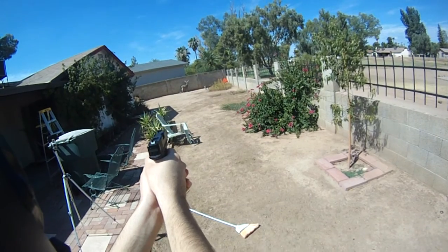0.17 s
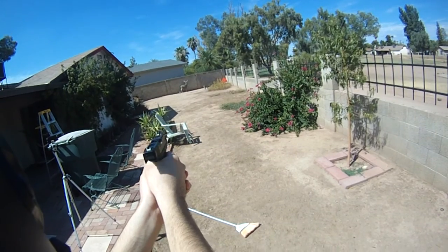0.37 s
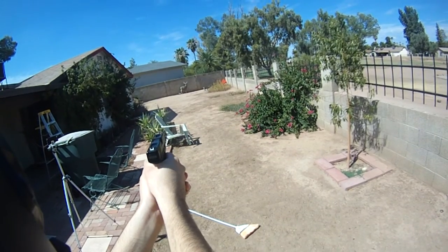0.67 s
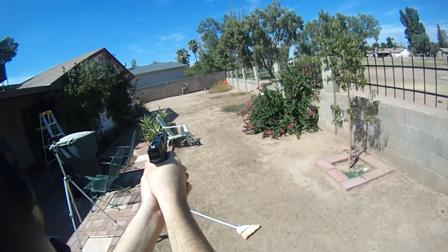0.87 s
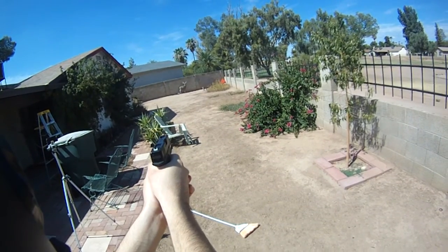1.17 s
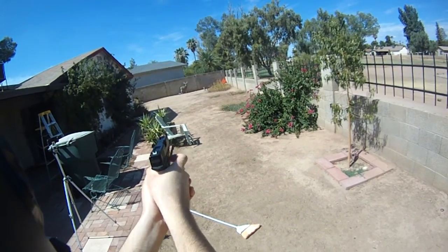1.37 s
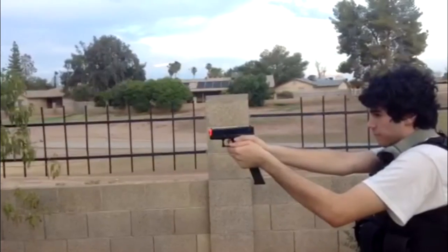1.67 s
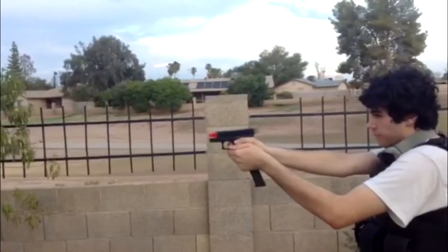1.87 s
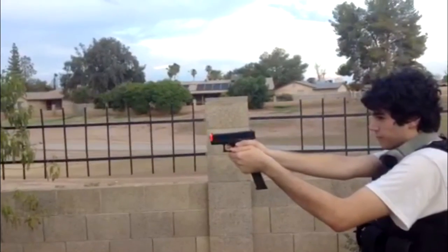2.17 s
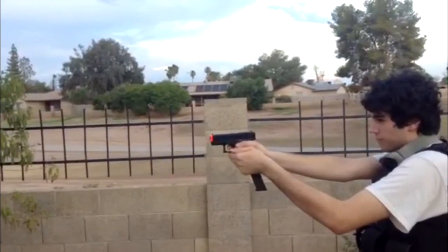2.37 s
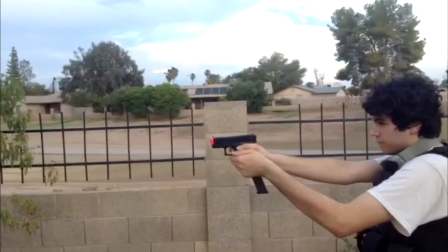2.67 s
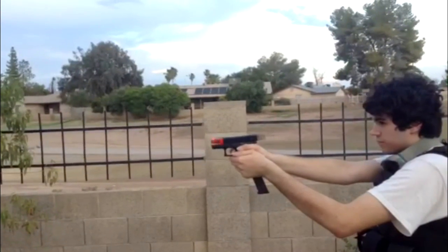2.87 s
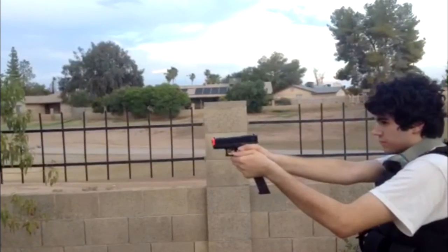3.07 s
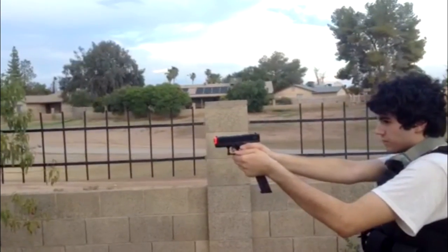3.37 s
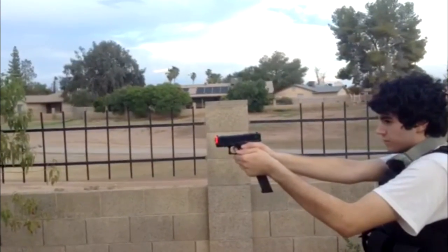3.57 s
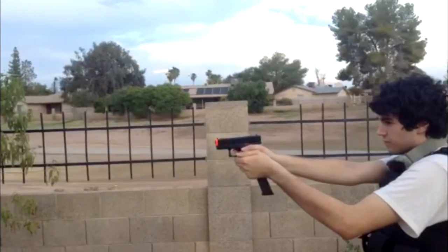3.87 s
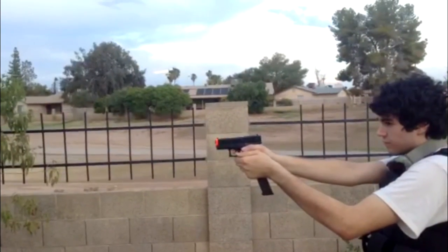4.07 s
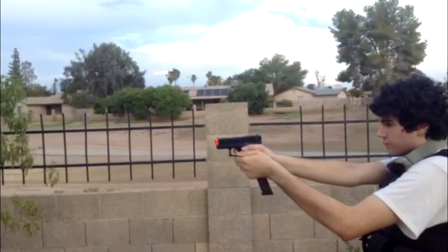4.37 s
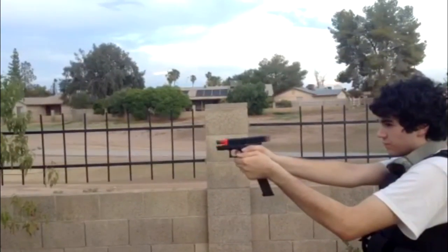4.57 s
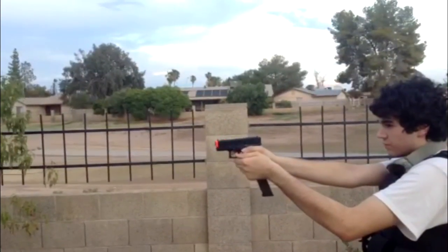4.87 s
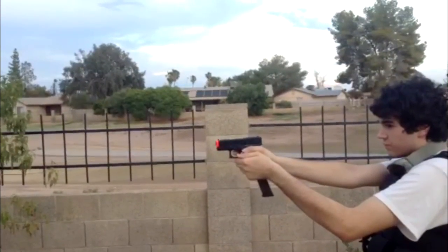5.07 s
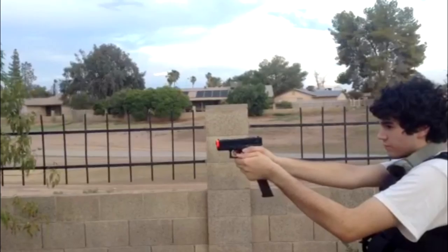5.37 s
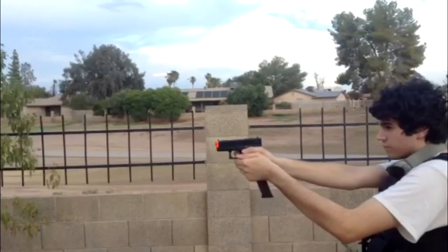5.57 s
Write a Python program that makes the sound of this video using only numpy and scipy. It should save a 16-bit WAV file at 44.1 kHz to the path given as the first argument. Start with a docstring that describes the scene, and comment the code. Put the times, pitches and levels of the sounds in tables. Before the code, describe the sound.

Near silence, then a gas airsoft pistol fires a rapid burst of eight muffled pops with whistling slide clacks, heard through a closed microphone housing, ending in a short gas leak. After small ticks, the sound cuts to an open microphone at the side: louder, sharp bursts of three to six pops about a second apart, with slide clatter, block-wall echo, faint traffic and hiss.

```python
"""After a faint tick in near silence, a gas airsoft pistol fires a fast, muffled burst in a walled yard.
The first part is heard from behind through a closed microphone housing, the rest from the side by an open microphone
whose sound drops out after the strongest pops. Slide contacts are noise bursts ringing in body modes;
gas pops and vents are cracks plus a low pressure push, and from the side a hiss. Walls are decaying noise tails.
Coloured noise makes the faint air behind, and the rumble, far traffic and hiss at the side."""
import sys
import numpy as np
from scipy import signal
from scipy.fft import rfft, irfft, next_fast_len
from scipy.io import wavfile
from scipy.ndimage import uniform_filter1d, map_coordinates

SR = 44100
rng = np.random.default_rng(int(sys.argv[2]) if len(sys.argv) > 2 else 0)


def field_ratio(decibels):
    """Amplitude ratio for a level in dB (20 dB per decade); scalars and array-likes work."""
    return 10 ** (np.asarray(decibels, dtype=float) / 20)


def dump(signal):
    """Clip the signal to [-1, 1] and save it as 16-bit WAV at the path in sys.argv[1]."""
    limited = np.clip(np.atleast_2d(signal).T, -1, 1)
    pcm = np.round(limited * 32767).astype(np.int16)
    wavfile.write(sys.argv[1], SR, pcm)


N = 252681
SWITCH_S = 1.412  # the listening point moves from behind to the side
POP_LEAD_S, VENT_LEAD_S = 0.0015, 0.001067  # the crack precedes the low push

# gas pops at the muzzle: (time [s], crack level [dB], low push level [dB])
POPS = [(0.368, -11, -22), (0.4175, -14, -15), (0.4713, -11.5, -22.5), (0.5286, -11.5, -18),
        (.588, -15.5, -27), (0.6475, -10.5, -21), (.704, -12.5, -16), (0.7577, -17, -19.5),
        (1.7055, -7, 3.5), (1.7562, -7, 0.5), (1.8067, -9, -0.5), (1.8503, -9.5, -4), (1.8922, -5.5, 3),
        (2.7571, -7, 3), (2.7984, -10, 1), (2.843, -8.5, -29.5), (2.8845, -8, -11), (2.9265, -5, -3),
        (3.6576, -5, 3.5), (3.6999, -5.5, -4), (3.741, -5, -10.5), (3.7833, -5.5, -23), (3.8259, -4, -6.5),
        (4.527, -6.5, -44), (4.5697, -5, 3.5), (4.6136, -7, -2.5), (4.6579, -4, -16.5),
        (4.7053, -11.5, -10.5), (4.7543, -10, -39.5), (5.6132, -6.5, -31.5), (5.6671, -18, -7.5),
        (5.729, -13.5, -14)]
# gas vents as the slide opens: (time [s], crack level [dB], low push level [dB])
VENTS = [(0.375, -16.5, -11), (0.4259, -17.5, -15), (0.4803, -16, -30.5), (0.5396, -18.5, -21.5),
         (0.599, -20.5, -20.5), (0.6606, -20, -19), (.729, -30, -26), (1.8573, -12.5, -28),
         (1.8989, -18, -32.5), (2.7647, -26, -31), (2.805, -12.5, -13), (2.8503, -13.5, -6.5),
         (2.8919, -17.5, -4.5), (2.9345, -14, -6.5), (3.663, -22, -33.5), (3.7073, -12, -24),
         (3.7476, -9, -9), (3.7913, -9, -5), (3.8353, -20.5, -10), (4.535, -12.5, -4), (4.5786, -13.5, -15),
         (4.6225, -17, -10), (4.668, -27.5, -9.5), (4.7158, -21, -9), (4.7661, -22, -10.5),
         (5.6254, -19, -16.5), (5.6807, -12, -17.5)]
# slide hits its rear stop: (time [s], level [dB])
STOPS = [(0.3855, -14), (0.4367, -20), (.4923, -20.5), (.5513, -21), (0.6113, -19), (0.6724, -18),
         (1.8239, -21.5), (1.8657, -12.5), (1.905, -26), (2.7707, -14.5), (2.815, -10), (2.8566, -6.5),
         (2.8995, -8), (2.94, -11.5), (3.6715, -12), (3.714, -8.5), (3.757, -9), (3.7995, -11.5),
         (3.8437, -8.5), (4.5405, -6), (4.586, -21), (4.6319, -11), (4.6768, -11.5), (4.729, -11.5),
         (4.7794, -14.5), (5.6356, -13), (5.6931, -15.5)]
# slide slams home: (time [s], level [dB], extra ringing [dB])
SLAMS = [(0.4084, -12, -1.5), (0.4621, -12.5, -3), (0.5204, -10.5, 5), (0.5779, -13.5, 0),
         (0.6385, -15, -0.5), (0.6963, -13, -10), (0.7498, -12, -9), (1.7495, -14, -7), (1.801, -7, -5),
         (1.844, -8.5, -3), (1.8847, -8.5, -0.5), (1.9278, -8, 0), (2.7916, -8.5, -2), (2.8356, -8.5, -2),
         (2.8775, -6, 1), (2.9198, -7.5, 6), (2.9617, -9.5, 0.5), (3.6928, -10, 0), (3.7323, -8, -4),
         (3.7752, -12, 12), (3.8189, -11.5, 4), (3.8633, -7.5, 9.5), (4.5624, -6, 5), (4.6061, -7.5, -1.5),
         (4.6495, -8.5, -1), (4.6985, -3.5, -2.5), (4.7469, -6.5, -1), (4.8025, -6.5, 5.5),
         (5.6609, -4, -3), (5.7198, -3, -3)]
# lighter knocks of the slide on its way: (time [s], level [dB])
RATTLES = [(0.398, -29), (0.406, -32), (0.4484, -29.5), (0.4555, -30), (.5042, -32.5), (.535, -24),
           (.563, -41), (0.5687, -33), (0.6225, -33), (.6306, -30), (.6557, -30.5), (0.684, -31),
           (2.83, -17), (3.7695, -17), (3.8566, -22), (3.8792, -19), (4.617, -16.5), (4.627, -15.5),
           (4.6643, -11), (4.6713, -14), (4.7211, -12.5), (4.7714, -11.5), (4.8195, -18.5), (5.6182, -12.5),
           (5.6711, -10)]
# trigger, hand and other small ticks: (time [s], level [dB], added tilt [dB/octave])
TICKS = [(.047, -59, -19), (0.3643, -24, -6), (.9772, -48.5, -0.5), (1.0006, -52, .5), (1.1024, -56.5, -3),
         (1.1628, -43, -3), (1.188, -48.5, -1), (1.2216, -57, -5), (2.2336, -39.5, -5), (2.2994, -45, -2),
         (2.3294, -41.5, 0), (3.2075, -40.5, -3), (3.2448, -15, 2), (3.2502, -19, 0.5), (3.3606, -36, -4.5),
         (3.386, -40, -5), (3.6165, -41, -4), (4.138, -39, -2.5), (4.1565, -31.5, 0), (4.1814, -37, -2),
         (4.253, -38.5, -3), (4.261, -34.5, -4), (4.305, -52, 9), (4.4727, -45, -6), (5.035, -40, -11),
         (5.1578, -40, 0), (5.1781, -31, 2), (5.2027, -37, 1), (5.218, -42.5, -5), (5.5932, -32, 3)]


def strokes(colour, start_s, end_s):
    """Contacts and cracks as (s, dB, t60 s, tilt, ringing dB): those of the gun's cycle, then the ticks."""
    kinds = [
        [(s - POP_LEAD_S, db, 0, 0) for s, db, _ in POPS],
        [(s - VENT_LEAD_S, db, 0, 0) for s, db, _ in VENTS],
        [(s, db, 0, 0) for s, db in STOPS],
        [(s, db, 0, ring_db) for s, db, ring_db in SLAMS],
        [(s, db, 0, 0) for s, db in RATTLES],
        [(s, db, tilt, 0) for s, db, tilt in TICKS],
    ]
    coloured = []
    for rows, (t60, tilt, ring_db) in zip(kinds, colour):
        coloured.append([(s, db, t60, tilt + own_tilt, ring_db + more_db)
                         for s, db, own_tilt, more_db in rows if start_s <= s < end_s])
    *cycle, ticks = coloured
    return sum(cycle, []), ticks


def clacks(rows, modes, broad_db, low_hz, high_hz, rise_s, strike, spiky_db, scatter_db):
    """A first-sample strike and spiky decaying noise; returns the straight part and the part ringing in the modes."""
    s, db, t60, tilt, ring_db = np.transpose(rows)[:, :, None]
    t = np.arange(3072) / SR
    noise = rng.standard_normal((len(rows), 2, len(t)))
    spikes_and_decay_db = spiky_db * noise[:, 1] - 60 * t / np.clip(t60, 0.002, 0.2)
    burst = noise[:, 0] * field_ratio(spikes_and_decay_db) * (1 - np.exp(-t / rise_s))
    burst[:, 0] = strike
    scatter = scatter_db * rng.standard_normal((len(rows), len(modes)))

    def paths(hz):
        slope = (1 + 1j * hz / 1500) ** (np.clip(tilt, -9, 9) / 6.02)  # tilt acts above about 1.5 kHz
        straight = field_ratio(broad_db) * high_pass(hz, low_hz, 0.91) / (1 + 1j * hz / high_hz)
        ringing = field_ratio(ring_db) * rings(hz, modes, scatter)
        return [straight * slope, ringing * slope]

    sound = filtered(burst, paths, size=1024)
    loudest = np.sqrt(uniform_filter1d(sound.sum(0) ** 2, size=88).max(1, keepdims=True))  # 2 ms rms
    sound *= field_ratio(db) / loudest
    where = np.round(s * SR).astype(int) + np.arange(len(t))
    return [np.bincount(where.ravel(), part.ravel(), N + len(t))[:N] for part in sound]


def rings(hz, modes, scatter_db):
    """Sum of well-damped resonances of alternating sign, at new strengths for every row of scatter."""
    total = 0
    for k, (centre_hz, width_hz, db) in enumerate(modes):
        q_term = 1j * (hz / centre_hz - centre_hz / hz) * centre_hz / max(width_hz, 200)
        total = total + (-1) ** k * field_ratio(db + scatter_db[:, k:k + 1]) / (1 + q_term)
    return total


def releases(start_s, end_s):
    """Low pushes of gas between two times, as (s, dB)."""
    return [(s, db) for s, _, db in POPS + VENTS if start_s <= s < end_s]


def pops(rows, length_s, front_s, spike):
    """Each release of gas: a thin pressure spike, then a longer swing the other way."""
    t = np.arange(800) / SR
    pulse = spike * np.exp(-(t / front_s) ** 2) - t / length_s * np.exp(1 - t / length_s)
    return np.convolve(kicks(rows), pulse)[:N]


def jet(rows, t60_s, soften):
    """Gas hisses on round the slide; an exponent below 1 narrows the gap between weak and strong releases."""
    flow = signal.lfilter([1], [1, -field_ratio(-60 / t60_s / SR)], kicks(rows) ** soften)
    turbulence = rng.standard_normal(N) * field_ratio(wobble(900))
    hiss = filtered(turbulence, lambda hz: high_pass(hz, 700, 0.085) / (1 + 1j * hz / 6000))
    return flow * unit(hiss)


# gas leaking as the pressure runs low: (start [s], end [s], start level [dB], extra fall after end [dB/s])
LEAK = [(0.703, .733, -30, 7999), (0.751, 0.82, -30, 378)]


def leak(modes):
    """Fluttering noise through the given modes, sagging as the pressure falls."""
    sag_db_per_s = 64
    t = np.arange(N) / SR
    flow = 0
    for start, end, db, release in LEAK:
        level_db = db - sag_db_per_s * (t - start) - release * np.maximum(t - end, 0)
        flow = flow + (t > start) * field_ratio(level_db)
    noise = filtered(rng.standard_normal(N), lambda hz: rings(hz, modes, np.zeros((1, len(modes))))[0])
    return unit(noise) * flow * field_ratio(1.4 * wobble(220))


# hammer swings in before a burst, beside: (time [s], level [dB])
HAMMERS = [(1.7005, -26), (2.7500, -22.5), (3.6491, -27), (4.5196, -22), (5.607, -23.5)]


def hammers(modes):
    """Swelling noise bursts with no sharp strike, straight and ringing parts."""
    rows = [(s, db, 0.04, 4, -5) for s, db in HAMMERS]
    return clacks(rows, modes, broad_db=-5.5, low_hz=900, high_hz=9000,
                  rise_s=0.004, strike=0, spiky_db=5, scatter_db=0.5)


# decay of the wall answer: (frequency [Hz], t60 before scaling [s])
YARD = [(200, 0.37), (1000, 0.24), (3000, 0.3), (8000, 0.29), (14000, 0.093)]


def yard(x, scale, delay_s):
    """Block walls answer: a noise tail in which each frequency dies at its own speed."""
    hz, t, z = signal.stft(rng.standard_normal(SR // 2), SR, nperseg=256)
    decay = field_ratio(-60 * t / scale / along(YARD, hz)[:, None])
    tail = signal.istft(z * decay, SR, nperseg=256)[1]
    late = np.pad(x, (round(delay_s * SR), 0))
    return signal.fftconvolve(late, tail / np.linalg.norm(tail))[:N]


# colour of pop, vent, stop, slam, rattle, tick: (t60 [s], tilt [dB/octave], ringing [dB])
COLOUR_BEHIND = [(0.016, 0, 6), (0.02, -7, -0.5), (0.0073, 1.5, 14), (0.027, 3.5, -2.5), (0.032, -2.5, 14),
                 (0.057, -1.5, 2)]
# pistol through the housing: (centre [Hz], width, at least 200 used [Hz], level [dB])
HOUSING = [(443, 190, -14), (1070, 100, -12), (1884, 510, -11.5), (2910, 406, -8.5), (4180, 190, -2.5),
           (4440, 52, -5), (5140, 314, 6), (5620, 425, 0.5), (6570, 450, -8), (7300, 280, -9.5),
           (7680, 370, -20), (9530, 270, -8), (11700, 890, -14.5), (11550, 290, -25), (13400, 380, -29),
           (14800, 720, -29.5)]


def behind():
    """The housing muffles the pops and lets the clacks whistle near 5 kHz."""
    cycle, ticks = strokes(COLOUR_BEHIND, 0, SWITCH_S)
    gun = sum(clacks(cycle + ticks, HOUSING, broad_db=-30, low_hz=206, high_hz=1516,
                     rise_s=0.00046, strike=5.2, spiky_db=6.0, scatter_db=2.0))
    push = pops(releases(0, SWITCH_S), length_s=0.00048, front_s=0.00022, spike=0.3)
    gun += filtered(push, lambda hz: 0.76 * high_pass(hz, 390, 1.1) * high_pass(hz, 143, 0.92)
                    / (1 + 1j * hz / 2000))
    walls = field_ratio(-17) * yard(gun, scale=1.0, delay_s=0.0024)
    return gun + leak(HOUSING) + walls + behind_air()


# colour of pop, vent, stop, slam, rattle, tick: (t60 [s], tilt [dB/octave], ringing [dB])
COLOUR_SIDE = [(.016, -1, -3.5), (.02, 1, 4.5), (.014, 8, 6), (.02, 5.5, 8.5), (.02, 7.5, 5),
               (.035, 2, -20)]
# ringing of the slide: (centre [Hz], width, at least 200 used [Hz], level [dB])
SLIDE = [(1137, 83, -6), (1340, 110, -10), (2327, 140, -8.5), (2312, 165, 11), (3760, 130, -3.5),
         (5404, 700, 5.5), (6600, 170, -7.5), (7120, 170, -4), (10670, 550, -17), (13600, 340, -7)]


def side():
    """Open microphone: its steep low cut rings after every pop; all but thump, clicks and circuit noise drops out."""
    gas = releases(SWITCH_S, N / SR)
    cycle, ticks = strokes(COLOUR_SIDE, SWITCH_S, N / SR)
    crack, ring = clacks(cycle, SLIDE, broad_db=-1, low_hz=405, high_hz=12300,
                         rise_s=0.000056, strike=2.0, spiky_db=7, scatter_db=2.0)
    soft = clacks(ticks, SLIDE, broad_db=10, low_hz=411, high_hz=9000,
                  rise_s=0.0002, strike=4.7, spiky_db=3.5, scatter_db=9)
    soft = filtered(np.array(soft), lambda hz: 1 / (1 + 1j * hz / 11000) ** 3)  # hands, plastic: little top
    swing = hammers(SLIDE)
    crack = crack + soft[0] + swing[0] + field_ratio(-16.0) * jet(gas, t60_s=0.065, soften=0.63)
    ring = ring + soft[1] + swing[1]
    push = pops(gas, length_s=0.00013, front_s=0.00004, spike=1.87)
    to_walls = crack + 0.33 * ring  # less of the ringing goes into the walls, so their answer sounds less tonal
    near_walls = field_ratio(-7.5) * yard(to_walls + 0.18 * push, scale=0.74, delay_s=0.005)
    far_walls = field_ratio(-23.5) * yard(to_walls, scale=1.26, delay_s=0.062)
    thump = filtered(push, lambda hz: 1.43 * high_pass(hz, 191.6, 1.59) * high_pass(hz, 63, 0.64))
    interrupted = field_ratio(gaps_db()) * (crack + ring + near_walls + far_walls + side_air())
    circuit_noise = field_ratio(-80) * rush(HISS)
    return interrupted + thump + gap_clicks() + circuit_noise


# long dropouts after the first three side pops: (start [s], end [s], level [dB], recovery [s])
LONG_GAPS = [(1.7092, 1.744, -44, 0.0053), (1.7578, 1.783, -43, .012), (1.8086, 1.819, -19, .004)]


def gaps_db():
    """Gain in dB: a brief dip after each strong pop, plus the long dropouts."""
    strong_db, blink_s, blink_db, blink_back_s = -3.2, 0.002, -9, 0.003
    blinks = [(s + 0.0004, s + 0.0005 + blink_s, blink_db, blink_back_s)
              for s, _, db in POPS if db > strong_db]
    t = np.arange(N) / SR
    return sum(np.interp(t, [start - 0.0003, start, end, end + back], [0, db, db, 0])
               for start, end, db, back in blinks + LONG_GAPS)


# thin clicks inside the second long gap: (time [s], level before filtering [dB])
GAP_CLICKS = [(1.7702, -23), (1.7727, -17), (1.7768, -25)]


def gap_clicks():
    """Band-limited impulses."""
    return filtered(kicks(GAP_CLICKS), lambda hz: high_pass(hz, 600, 0.7) / (1 + 1j * hz / 11000))


# faint air behind the pistol: (frequency [Hz], relative density [dB/Hz])
BEHIND_AIR = [(24, -34), (40, -12.5), (84, -12.5), (233, 1), (422, -5.5), (466, -2), (1920, -9), (2850, -7),
              (8270, -15), (13600, -19.5), (15000, -20.5)]


def behind_air():
    """Steady coloured noise."""
    return field_ratio(-64.5) * rush(BEHIND_AIR)


# low rumble, far traffic, high hiss: (frequency [Hz], relative density [dB/Hz])
RUMBLE = [(30, -52), (60, -36.5), (103, -16), (170, -5), (205, -3), (237, 2.5), (280, -7), (350, -7.5),
          (420, -32), (550, -41), (900, -120)]
TRAFFIC = [(220, -37), (380, -7), (424, -9), (634, 2.5), (785, -6.5), (1260, -5), (1550, -14),
           (2500, -18.5), (3250, -54), (5500, -120)]
HISS = [(880, -41), (1500, 1), (2340, -1), (2860, -3), (3090, -4.5), (3820, -3.5), (5840, -7.5), (6610, -9),
        (7420, -6), (8830, -9), (13100, -20), (15000, -53.5)]
# slow drift before sinking: (time [s], rumble level [dB], traffic level [dB], hiss level [dB])
SIDE_AIR = [(1.42, -45.5, -49, -53), (1.6, -47.5, -47, -51), (2.2, -52.5, -48.5, -56.5),
            (2.7, -49.5, -51.5, -57), (3.25, -57, -49, -56), (3.6, -50.5, -51.5, -55.5),
            (4.151, -54, -49, -56), (4.5, -49, -53, -54.5), (5.05, -54.5, -48.5, -56),
            (5.45, -45, -50.5, -57.5), (5.73, -46, -51, -55)]
# shift at each pop, one value each for rumble, traffic, hiss [dB]
SINK_DB = [-2.5, -16.5, 0.5]


def side_air():
    """Drifting noise bands: at each pop traffic sinks far, rumble a little, hiss rises slightly; all creep back."""
    creep_s = 0.32
    t = np.arange(N) / SR
    shots = np.array([s for s, *_ in POPS if s > SWITCH_S])
    since = t - shots[np.maximum(np.searchsorted(shots, t) - 1, 0)]
    sunk = (since > 0) * np.exp(-np.abs(since) / creep_s)
    rumble_db, traffic_db, hiss_db = [db + sink_db * sunk for db, sink_db in zip(curves(SIDE_AIR), SINK_DB)]
    rumble = field_ratio(rumble_db + 1.5 * wobble(11)) * rush(RUMBLE)
    traffic = field_ratio(traffic_db) * (rush(TRAFFIC) * field_ratio(1.4 * wobble(9)) + far_machine())
    hiss = field_ratio(hiss_db + 0.4 * wobble(4.2)) * rush(HISS)
    return rumble + traffic + hiss


# a far machine's hum: (frequency [Hz], sine amplitude re traffic rms [dB])
HUM = [(1238, -15), (1351, -14)]


def far_machine():
    """Sines with unsteady level and phase."""
    t = np.arange(N) / SR
    return sum(field_ratio(db + 2.5 * wobble(8)) * np.sin(2 * np.pi * hz * t + 1.5 * wobble(20)) for hz, db in HUM)


def along(points, hz):
    """Interpolates (Hz, value) points on a log axis."""
    f, v = np.transpose(points)
    return np.interp(np.log(hz + 1), np.log(f + 1), v)


def curves(rows):
    """One value per sample for each column after the time."""
    s, *cols = np.transpose(rows)
    return [np.interp(np.arange(N) / SR, s, c) for c in cols]


def filtered(x, response, size=8192):
    """x times a complex response of frequency; 1 Hz is added to avoid zero."""
    m = next_fast_len(x.shape[-1] + size)
    return irfft(rfft(x, m) * response(np.fft.rfftfreq(m, 1 / SR) + 1), m)[..., :x.shape[-1]]


def unit(x):
    """Scaled to rms 1."""
    return x / np.sqrt(np.mean(x ** 2))


def rush(spectrum):
    """Coloured noise of rms 1."""
    return unit(filtered(rng.standard_normal(N), lambda hz: field_ratio(along(spectrum, hz))))


def wobble(rate_hz):
    """A smooth random curve, rate_hz knots a second."""
    knots = rng.standard_normal(int(N * rate_hz / SR) + 4)
    return map_coordinates(knots, [np.arange(N) * rate_hz / SR])


def high_pass(hz, corner_hz, q):
    """A resonant second-order high-pass."""
    s = 1j * hz / corner_hz
    return s * s / (s * s + s / q + 1)


def kicks(rows):
    """One impulse for each (s, dB) row."""
    train = np.zeros(N)
    for s, db in rows:
        train[round(s * SR)] = field_ratio(db)
    return train


def scene():
    """Behind the pistol, then beside it, with a 5.4 ms crossfade."""
    moved = np.clip((np.arange(N) / SR - SWITCH_S) / 0.0054, 0, 1)
    return ((1 - moved) * behind() + moved * side())[None]


def band_limit(x):
    """A steep low-pass at the top of the band."""
    return signal.sosfilt(signal.butter(12, 16460, fs=SR, output="sos"), x)


def record(dry):
    """The loudest pops hit the converter's soft ceiling; bass and top are cut."""
    ceiling = 0.98
    clipped = dry / (1 + np.abs(dry / ceiling) ** 8) ** (1 / 8)
    band = filtered(clipped, lambda hz: np.abs(high_pass(hz, 30, 0.92)) / np.sqrt(1 + (hz / 14900) ** 60))
    return band_limit(band)


dry = scene()
out = record(dry)
dump(out)
```